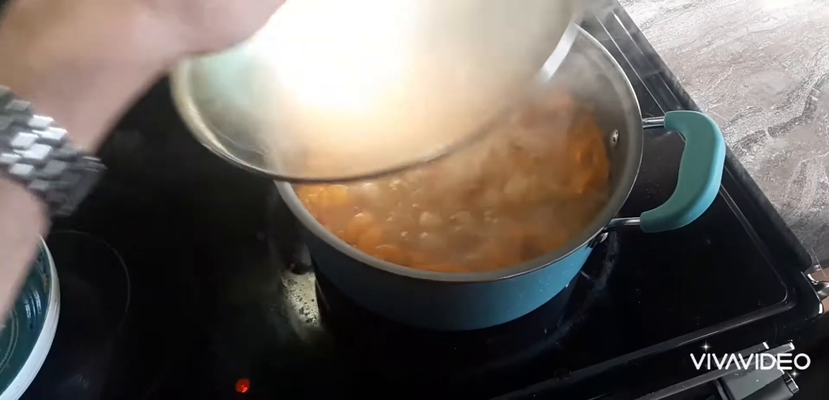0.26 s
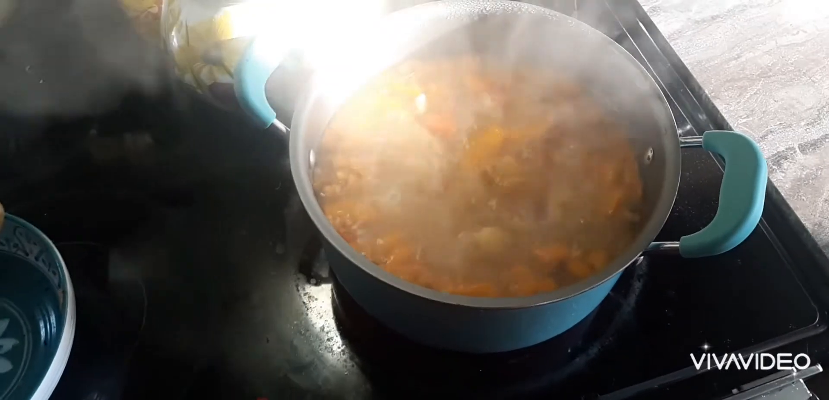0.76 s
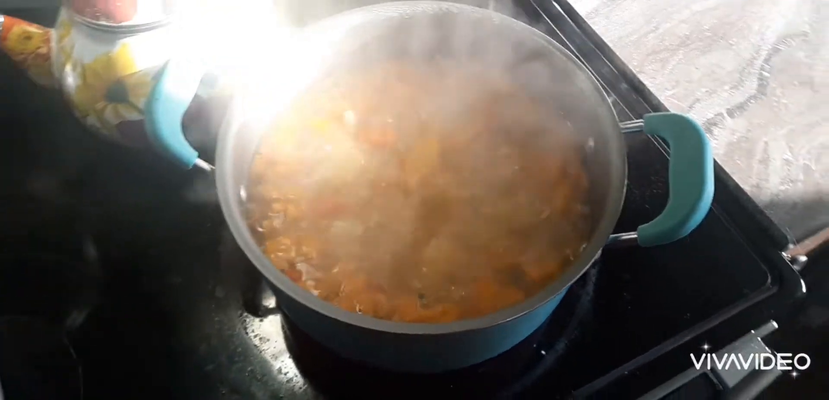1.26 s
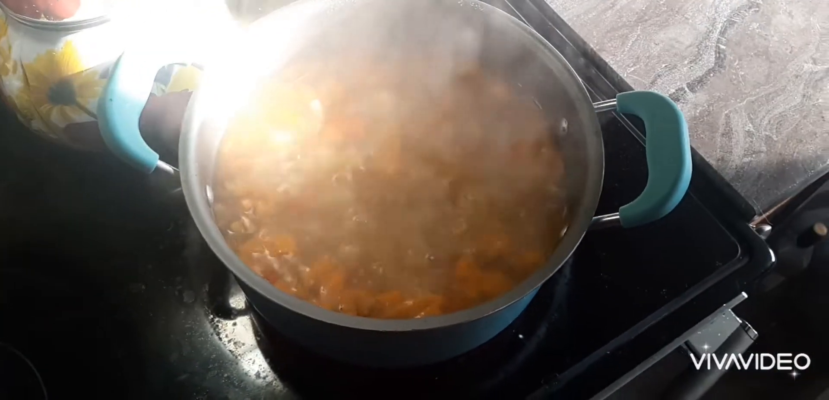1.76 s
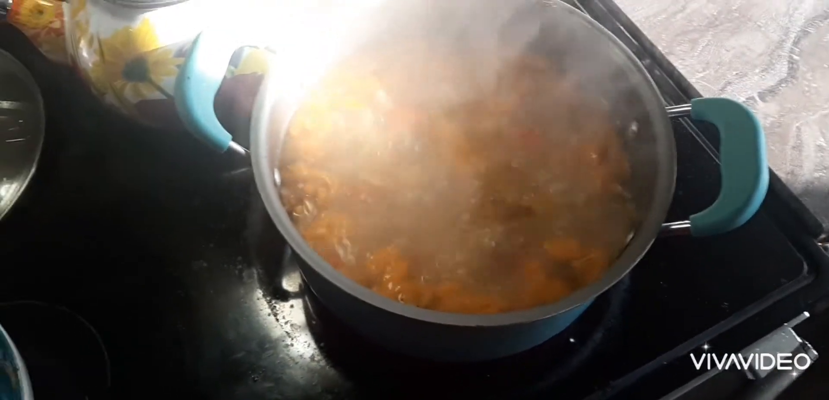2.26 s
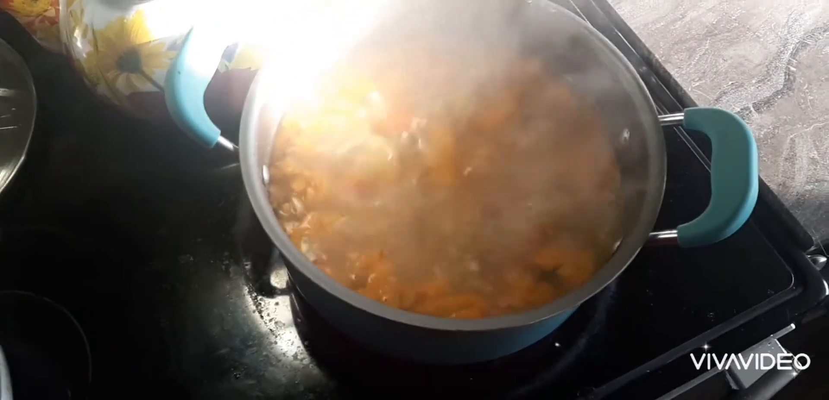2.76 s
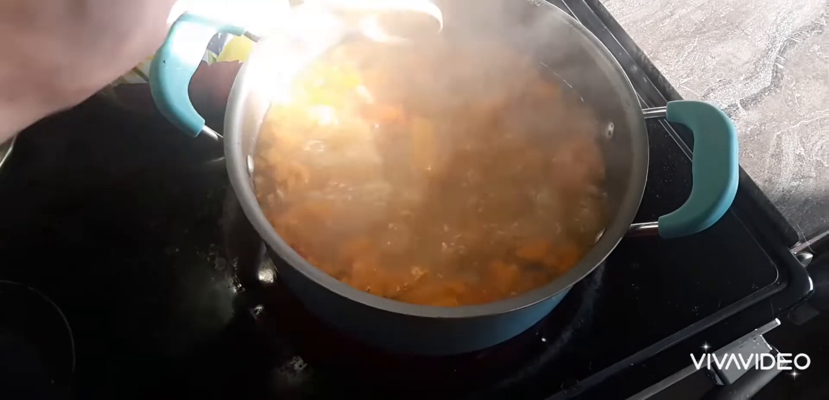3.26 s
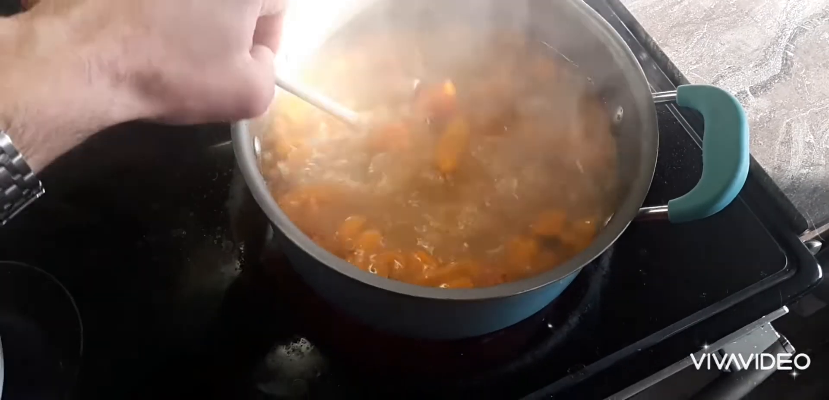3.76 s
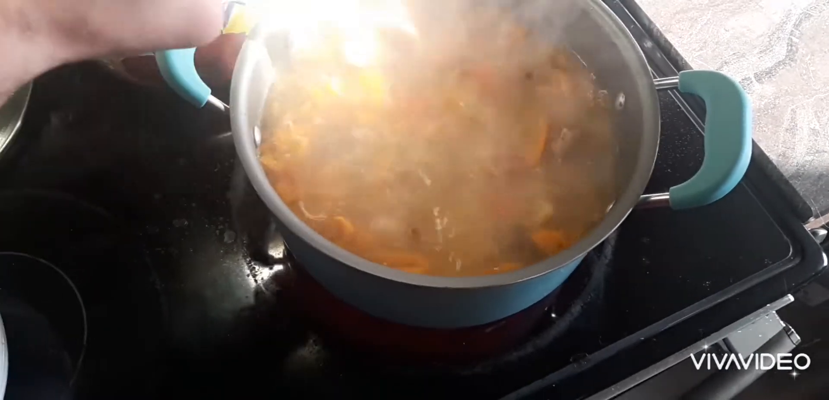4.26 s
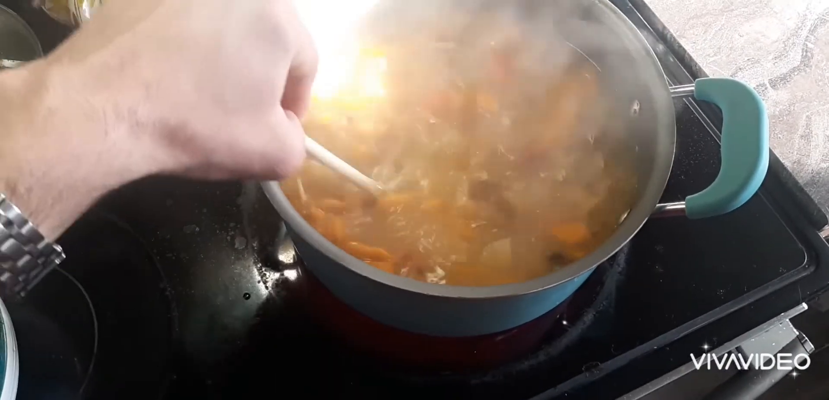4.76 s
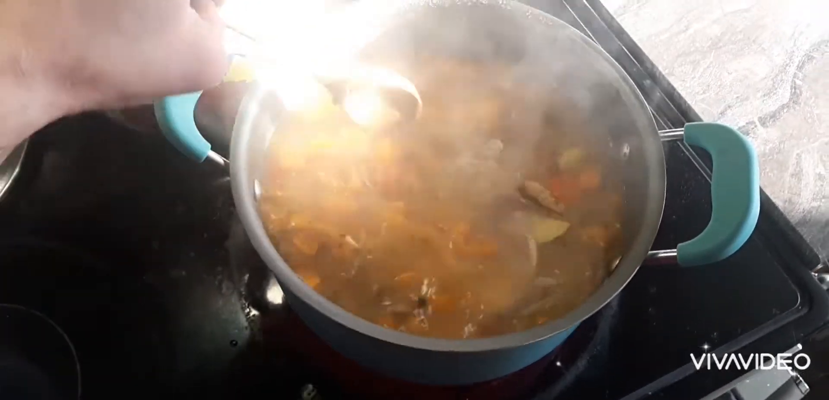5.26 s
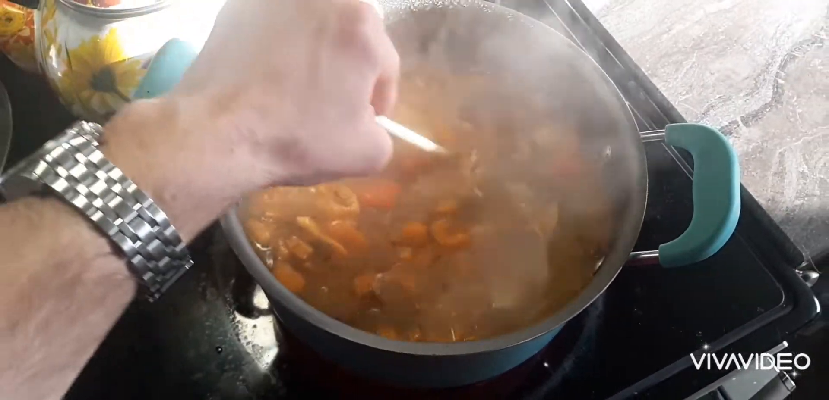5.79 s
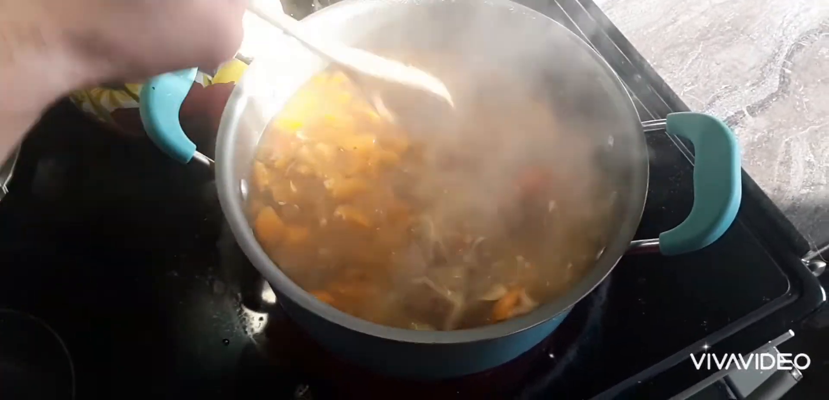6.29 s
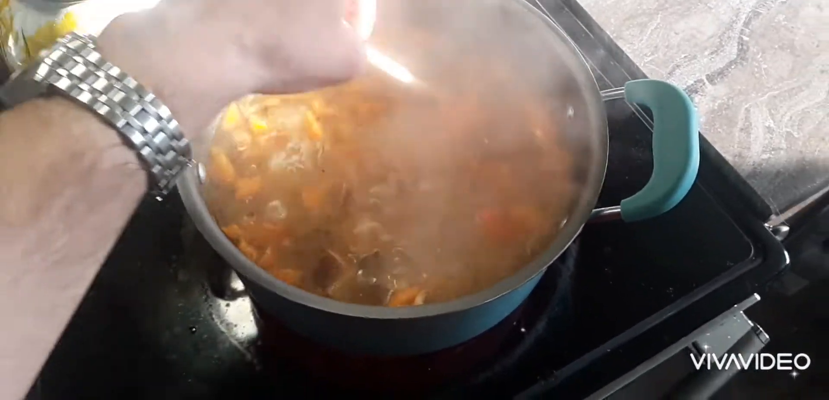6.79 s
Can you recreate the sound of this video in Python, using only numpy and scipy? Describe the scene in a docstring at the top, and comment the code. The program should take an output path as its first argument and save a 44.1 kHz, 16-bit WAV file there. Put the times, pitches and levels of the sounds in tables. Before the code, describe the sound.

Hollow rumble as a lid lifts off boiling soup, a loud glassy clatter at two seconds, then soft wooden knocks, plops and calming bubbles.

```python
"""A pot of soup simmers on a humming hob in a small kitchen, heard from a phone held above it.
Pitched pulses make the bubbles and plops, resonant pips the fine sizzle; the boil calms with the stirring.
The glass lid is lifted and put down with a clatter: worktop thuds, glass modes, a noise shimmer.
A wooden spoon knocks (noise ticks, pot and worktop modes) and stirs: each stroke swells froth and plops.
An appliance motor drones as sines over coloured room noise."""
import sys
import numpy as np
from scipy import signal
from scipy.fft import rfft, irfft, next_fast_len
from scipy.io import wavfile

SR = 44100
rng = np.random.default_rng(int(sys.argv[2]) if len(sys.argv) > 2 else 0)


def materialize(psi):
    """Save the field psi as 16-bit PCM at rate SR to the path in sys.argv[1].

    A 1-D psi becomes a single channel; in a 2-D psi each row is a channel.
    """
    bounded = np.clip(np.atleast_2d(psi).T, -1, 1)
    quanta = np.round(bounded * 32767).astype(np.int16)
    wavfile.write(sys.argv[1], SR, quanta)


N = 310023
TIME = np.arange(N) / SR  # s
RING_TIME = TIME[:SR * 3 // 4]  # s, longest decay rendered
PORT_GAP_M, SOUND_M_PER_S = 0.19, 343


def undb(db):
    """Decibels to gain."""
    return 10 ** (np.asarray(db) / 20)


def unit(x):
    """Scale to rms 1."""
    return x / np.sqrt(np.mean(x ** 2))


def fade(t60_s):
    """Exponential decay, 60 dB down after t60_s."""
    return np.exp(-np.log(1000) * RING_TIME / t60_s)


def swell(middle_s, length_s):
    """Smooth rise and fall, about 9 dB down at either end of its length."""
    return np.exp(-(2 * (TIME - middle_s) / length_s) ** 2)


def pan(db):
    """Left and right gains for a left-minus-right level."""
    return undb(db * np.array([[.5], [-.5]]))


def add(track, start_s, sound):
    """Mix a sound into a track."""
    i = int(np.clip(start_s * SR, 0, N - 1))
    track[..., i:i + sound.shape[-1]] += sound[..., :N - i]


def colour(x, points):
    """Filter by a spectrum of (frequency [Hz], level [dB]) points."""
    length = x.shape[-1]
    size = next_fast_len(length)
    hz, db = np.transpose(points)
    log_bins = np.log(np.fft.rfftfreq(size, 1 / SR) + 1)
    gain = undb(np.interp(log_bins, np.log(hz), db))
    return irfft(rfft(x, size) * gain, size)[..., :length]


def no_bass(x, hz):
    """High-pass: a small source pushes little air at long wavelengths."""
    return signal.sosfilt(signal.butter(4, hz, "high", fs=SR, output="sos"), x)


def walk(rate_hz):
    """Random wander between knots at the given rate, rms 1."""
    knots = rng.standard_normal(4096)
    return unit(np.interp(TIME * rate_hz, np.arange(len(knots)), knots))


def diffuse(length):
    """Noise from all sides at two spaced ports: alike in the bass, unrelated in the treble."""
    size = next_fast_len(length)
    likeness = np.sinc(2 * np.fft.rfftfreq(size, 1 / SR) * PORT_GAP_M / SOUND_M_PER_S)
    noise = rfft(rng.standard_normal((2, size)))
    mid, side = noise * np.sqrt([1 + likeness, 1 - likeness])
    return unit(irfft([mid + side, mid - side], size)[:, :length])


def tones(modes):
    """One decaying sine per mode."""
    return np.array([undb(db) * np.sin(2 * np.pi * hz * RING_TIME) * fade(t60_s)
                     for hz, db, t60_s in modes])


def ring(partials, scatter_db):
    """Each point of contact weights the modes differently."""
    gains = undb(scatter_db * rng.standard_normal(len(partials)))
    return gains @ partials / np.linalg.norm(gains * partials.max(axis=1))


def pulse(hz, t60_s, glide):
    """A few cycles swell within half a period and die away while the pitch slides."""
    t = TIME[:int(1.5 * t60_s * SR) + 2]
    rise = 1 - np.exp(-(2 * hz * t) ** 2)
    decay = np.exp(-np.log(1000) * t / t60_s)
    cycles = hz * t * (1 + glide * t / t60_s / 2)
    return rise * decay * np.sin(2 * np.pi * cycles)


def kitchen(x, wet_db, lead_ms, t60_s=0.14, treble_t60_s=0.46):
    """Direct sound reaches the left port first; the hard walls answer a few milliseconds later."""
    noise = diffuse(len(RING_TIME))
    low = colour(noise, [(2500, 4.5), (4200, -5.5), (8000, -17)])
    walls = low * fade(t60_s) + .75 * (noise - low) * fade(treble_t60_s)
    walls *= np.clip(RING_TIME / 0.0061 - .5, 0, 1)  # late onset
    walls *= undb(wet_db) / np.linalg.norm(fade(t60_s))
    left, right = np.broadcast_to(x, (2, N))
    direct = np.array([left, np.roll(right, int(lead_ms * SR / 1000))])
    return direct + signal.oaconvolve(left[None], walls, axes=1)[:, :N]


# fainter steady motor tones: (mean frequency [Hz], rms level [dB])
FAINT_TONES = [(57, -81.5), (269.2, -77.5), (522.2, -83), (1007, -91.5)]
# room air spectrum: (frequency [Hz], spectral level [dB per Hz])
ROOM_AIR_COLOUR = [(25, -14.5), (40, -9.5), (56, -7.5), (90, -5), (130, 1), (200, -11.5), (400, -16.5),
                   (700, -16.5), (1500, -24), (4000, -20), (11000, -28.5)]
DRONE_DB, ROOM_AIR_DB = -65.5, -68  # rms
DRONE_HZ, DRONE_RISE_HZ, DRONE_RISE_START_S, DRONE_RISE_LENGTH_S = 119.8, 1.42, 3.53, 1.97


def hum(waver_db=0.8):
    """An appliance motor drones unsteadily over the room air and speeds up a little, once."""
    rise = np.clip((TIME - DRONE_RISE_START_S) / DRONE_RISE_LENGTH_S, 0, 1)
    drone_turns = np.cumsum(DRONE_HZ + DRONE_RISE_HZ * rise) / SR
    drone = undb(DRONE_DB + waver_db * walk(4)) * np.sin(2 * np.pi * drone_turns)
    wavering_time = np.cumsum(1 + .005 * walk(2)) / SR
    faint = sum(undb(db) * np.sin(2 * np.pi * hz * wavering_time) for hz, db in FAINT_TONES)
    room_air = undb(ROOM_AIR_DB) * unit(colour(diffuse(N), ROOM_AIR_COLOUR))
    return np.sqrt(2) * (drone + faint) + room_air


GAP_HZ, GAP_RISE_HZ_PER_S = 301, 1200
GAP_DB, GAP_ATTACK_S, GAP_T60_S = -49.5, 0.041, 0.61


def opening():
    """The boil rumbles hollow in the gap under the rising lid, ever higher and, after its attack, weaker."""
    turns = np.cumsum(GAP_HZ + GAP_RISE_HZ_PER_S * RING_TIME) / SR
    flutter = (walk(170.6) + 1j * walk(169))[:len(turns)]
    rumble = (flutter * np.exp(2j * np.pi * turns)).real
    attack = np.minimum(RING_TIME / GAP_ATTACK_S, 1) ** 2
    out = np.zeros(N)
    add(out, 0, undb(GAP_DB) * rumble * attack * fade(GAP_T60_S))
    return kitchen(out, wet_db=-6, lead_ms=.1)


# lid rim landing: (time [s], thud level before doubling [dB], thud pitch [Hz], thud T60 [s],
# clank level [dB])
LID_BLOWS = [(2.0431, -11, 475.6, 0.0048, -32.5), (2.0875, -14.5, 477.2, 0.029, -26.5),
             (2.109, -22, 420, 0.015, -22), (2.112, -10.5, 330, 0.0057, -16.5),
             (2.1185, -6.5, 399.6, 0.01, -12), (2.126, -22, 455, .014, -17.5),
             (2.1298, -10.5, 352, .016, -21.5), (2.1378, -10.5, 420, .014, -24.5),
             (2.1451, -15, 480.7, 0.013, -21), (2.1536, -7.5, 411.5, 0.024, -18.5),
             (2.1827, -20, 397.4, 0.011, -35)]
# worktop, also struck through the pot: (frequency [Hz], relative level [dB], T60 [s])
WORKTOP_MODES = [(130, -14.5, 0.28), (159, -8.5, 0.27), (197.3, -2, 0.22), (243, -9.5, 0.28),
                 (298, -10, 0.34), (325, -8, 0.83), (349.3, -3, 0.099), (369, -1, 0.22), (406, -6.5, 0.071),
                 (464, -3.5, 0.065), (499, 3, .2), (513, 2, 0.097), (802.3, -16.5, .25), (850, -6, 0.21),
                 (939, -8, 0.25)]
# glass and steel rim: (frequency [Hz], relative level [dB], T60 [s])
LID_MODES = [(1175, -5, .22), (1265, -6, .28), (1421, -11, .4), (1502, -6, .26), (1575, -10, .8),
             (1662, -3, .28), (1880, -2, .18), (2175, -6, .25), (2382, -1, .25), (2449, -6, .27),
             (2578, 2, .24), (2632, -3, .24), (2713, -2, .25), (2800, 3, .24), (2947, 2, .18),
             (3057, 1, .2), (3176, -2, .22), (3327, -4, .24), (3451, -1, .2), (3542, -3, .2),
             (3951, -7, .2), (5021, -6, .18)]
# dense upper glass modes: (frequency [Hz], spectral level [dB per Hz])
SHIMMER_COLOUR = [(300, -18), (600, -2.5), (850, -2.5), (1300, -4.5), (2100, -4.5), (2500, -1), (2850, 1.5),
                  (3500, -5.5), (4100, -8), (6000, -11.5), (8500, -17.5), (11000, -20)]
GLASS_DB = -13  # modes relative to clank level


def lid(worktop_db=-9.5, dense_db=-6, dense_t60_s=0.2, crack_db=1, crack_t60_s=0.013):
    """The rim touches twice, then rattles flat: each blow thumps the worktop and rings the glass."""
    thuds, clanks = np.zeros(N), np.zeros((2, N))
    worktop, glass = tones(WORKTOP_MODES), tones(LID_MODES)
    for start_s, thud_db, hz, thud_t60_s, clank_db in LID_BLOWS:
        add(thuds, start_s, 2 * undb(thud_db) * pulse(hz, thud_t60_s, 0))
        add(thuds, start_s, undb(thud_db + worktop_db) * ring(worktop, 1))
        # countless upper modes: crack at contact, then a short shimmer
        shimmer = unit(colour(diffuse(len(RING_TIME)), SHIMMER_COLOUR))
        shimmer *= undb(dense_db) * fade(dense_t60_s) + undb(crack_db) * fade(crack_t60_s)
        clank = shimmer + undb(GLASS_DB) * ring(glass, 2.7)
        add(clanks, start_s, undb(clank_db) * clank)
    thuds = kitchen(no_bass(thuds, hz=118), wet_db=-6.0, lead_ms=.26, t60_s=0.3)
    clanks = kitchen(no_bass(clanks, hz=249.9), wet_db=-9.0, lead_ms=0.2, t60_s=0.37, treble_t60_s=.25)
    return thuds + clanks


# rim scrape: (frequency [Hz], spectral level [dB per Hz])
SLIDE_COLOUR = [(300, 6.5), (700, -0.5), (1800, -15), (2400, -1), (2800, -12), (3200, 0.5), (4500, -10),
                (6000, -1), (7000, -7), (11000, -11.5)]
SLIDE_MIDDLE_S, SLIDE_LENGTH_S, SLIDE_DB = 2.472, 0.081, -52


def slide():
    """The steel rim catches and slips as the lid slides to rest: sparse random clicks, coloured."""
    slips = rng.standard_normal((2, N)) * (rng.random(N) < 2500 / SR)
    scrape = unit(no_bass(colour(slips, SLIDE_COLOUR), hz=250))
    return scrape * undb(SLIDE_DB) * swell(SLIDE_MIDDLE_S, SLIDE_LENGTH_S)


# spoon on pot: (time [s], knock level [dB], dull body level [dB], left minus right [dB])
KNOCKS = [(3.4515, -31, -54.5, -3), (3.4570, -40, -57, -13), (3.5090, -47, -56.5, 0),
          (3.5390, -42.5, -49.5, -5), (3.6870, -43.5, -60, -10), (4.239, -47, -70, -7),
          (4.4662, -44, -51, 0), (4.4783, -34.5, -51, -7.5), (4.5060, -60, -51, -2),
          (6.6024, -50.5, -85, -10), (6.752, -30.5, -68, -11), (6.769, -46, -78, -13),
          (6.8118, -43.5, -84, -12), (6.8564, -47, -67, -9)]
# pot wall, damped by the soup: (frequency [Hz], relative level [dB], T60 [s])
POT_MODES = [(720, -10, 0.029), (1430, -21, 0.021), (1690, -17, 0.052), (2510, -20, 0.012),
             (3300, 15, 0.026), (3720, 12, 0.0087), (3840, 15, 0.018), (4810, 5, 0.0041)]
# wooden tick: (frequency [Hz], spectral level [dB per Hz])
KNOCK_COLOUR = [(300, -15), (900, -2.5), (1600, 2.5), (2500, 4.5), (3700, 1), (4600, 1), (6500, 2),
                (8000, 0), (11000, -11)]
TICK_T60_S = .012


def spoon(ring_db=-4, bump_db=1, choke_t60_s=0.12, hob_db=3):
    """Wood on the filled pot: a dry tick, a choked ring, and a dull bump through the hob."""
    ticks, bumps = np.zeros((2, N)), np.zeros(N)
    pot, worktop = tones(POT_MODES), tones(WORKTOP_MODES)
    for start_s, knock_db, body_db, pan_db in KNOCKS:
        tick = unit(colour(rng.standard_normal(len(RING_TIME)), KNOCK_COLOUR))
        # soft wet wood takes about a millisecond to bite
        tick *= fade(TICK_T60_S) * (1 - fade(0.0015))
        add(ticks, start_s, undb(knock_db) * pan(pan_db) * (tick + undb(ring_db) * ring(pot, 1.5)))
        # the heavy pot damps the worktop under it
        add(bumps, start_s, undb(body_db + hob_db) * ring(worktop, 2) * fade(choke_t60_s))
        add(bumps, start_s, undb(body_db + bump_db) * pulse(152, 0.1, 0))
    ticks = kitchen(ticks, wet_db=4, lead_ms=0.2, t60_s=0.36, treble_t60_s=.24)
    bumps = kitchen(no_bass(bumps, hz=85), wet_db=2, lead_ms=0.14, t60_s=0.34)
    return ticks + bumps


BUBBLE_SIZES_HZ = np.geomspace(800, 10500, 18)
BURSTS_PER_S_PER_SIZE = 65
FLURRY_KNOTS = 240  # over the whole scene


def fizz(spectrum, spread_db, flurry_db, wet_db, sharpness):
    """Tiny bubbles of each size burst in their own flurries as rounded pips, most faint, few loud; rms 1."""
    out, count = np.zeros(N), int(BURSTS_PER_S_PER_SIZE * N / SR)
    for hz in BUBBLE_SIZES_HZ:
        at = rng.integers(0, N, count)
        knots = rng.standard_normal(FLURRY_KNOTS)
        flurry = np.interp(at / N, np.linspace(0, 1, FLURRY_KNOTS), knots)
        loudness_db = spread_db * np.minimum(rng.exponential(size=count), 4)
        sizes = undb(loudness_db + flurry_db * np.minimum(flurry, 2))
        # tiny offset keeps the filters numerically awake
        bursts = np.bincount(at, sizes * rng.choice([-1, 1], count), N) + 1e-18
        resonance = signal.iirpeak(hz, sharpness, fs=SR)
        # two passes round the onset
        out += signal.lfilter(*resonance, signal.lfilter(*resonance, bursts))
    return unit(kitchen(no_bass(colour(out, spectrum), hz=300.2), wet_db, lead_ms=.1))


# boil crackle: (frequency [Hz], spectral level [dB per Hz])
SIZZLE_COLOUR = [(700, -8.5), (1500, -13), (2400, -12), (3300, -3.5), (4000, 1), (4600, -3.5), (5600, 4),
                 (6500, 3.5), (7500, -4), (10000, -5), (11500, -23.5)]


def sizzle(strength, surge_db=1.73):
    """The boil crackles at the surface and along the hot wall."""
    crackle = fizz(SIZZLE_COLOUR, spread_db=4.0, flurry_db=4.0, wet_db=-2.0, sharpness=3.5)
    return crackle * strength * undb(surge_db * walk(18))


# breaking froth: (frequency [Hz], spectral level [dB per Hz])
WASH_COLOUR = [(300, -15), (900, -7.5), (1600, -20.5), (2500, -10.5), (3200, -0.5), (3900, 2), (4600, -7.5),
               (7000, -5.5), (11000, -14)]


def wash(strength):
    """The spoon folds the soup over and breaks its froth."""
    return strength * fizz(WASH_COLOUR, spread_db=3.5, flurry_db=3.2, wet_db=-1.5, sharpness=3.5)


# single bubbles snapping at the surface: (time [s], level before attack shaping [dB])
SNAPS = [(2.807, -33.5), (4.348, -42), (5.162, -36.5), (5.185, -39.5), (5.299, -42), (5.437, -39),
         (5.602, -39), (6.576, -36), (6.6, -37)]
SNAP_MEAN_HZ = 6360


def snaps(wet_db=-8, scatter=0.055, t60_s=0.0062, attack_t60_s=0.0011):
    """A small bubble's film breaks with a bright tick."""
    out = np.zeros(N)
    for (start_s, db), chance in zip(SNAPS, rng.standard_normal(len(SNAPS))):
        note = pulse(SNAP_MEAN_HZ * (1 + scatter * chance), t60_s, .05)
        add(out, start_s, undb(db) * note * (1 - fade(attack_t60_s))[:len(note)])
    return kitchen(out, wet_db, lead_ms=.1)


def bubbling(strength, centre_hz=370, octaves=.33, cycles=8, spread_db=4.0, surge_db=1.56,
             surges_per_s=16, count=1800):
    """Steam bubbles swell and collapse on the bottom of the pot, in short surges."""
    out = np.zeros(N)
    starts_s = rng.random(count) * N / SR
    chances = np.clip(rng.standard_normal((count, 2)), -3, 2.4)
    for start_s, (pitch, size) in zip(starts_s, chances):
        hz = centre_hz * 2 ** (octaves * pitch)
        add(out, start_s, undb(spread_db * size) * pulse(hz, cycles / hz, 0.096))
    out *= undb(surge_db * walk(surges_per_s))
    return no_bass(unit(kitchen(out, wet_db=-2.5, lead_ms=.1, t60_s=0.41)), hz=132) * strength


PLOP_CYCLES = 11  # T60 in periods of the starting pitch


def small_plops(strength, centre_hz=1020, octaves=.38, spread_db=5, count=700):
    """Many faint air pockets open wherever the soup moves."""
    out = np.zeros(N)
    starts_s = rng.random(count) * N / SR
    chances = np.clip(rng.standard_normal((count, 2)), -2, 2)
    for start_s, (pitch, size) in zip(starts_s, chances):
        hz = centre_hz * 2 ** (octaves * pitch)
        add(out, start_s, undb(spread_db * size) * pulse(hz, PLOP_CYCLES / hz, .1))
    return unit(kitchen(out, wet_db=-1, lead_ms=.14, t60_s=.3)) * strength


# air pockets bursting: (time [s], level before attack shaping [dB], starting pitch [Hz])
PLOPS = [(0.71, -37, 980), (.820, -45.5, 366), (1.114, -44, 384), (2.5067, -45.5, 1000),
         (3.5389, -34, 1040), (3.628, -44, 1120), (4.479, -38, 965), (4.6419, -31.5, 1320),
         (4.6500, -26.5, 820), (4.6615, -35, 680), (4.683, -34, 1010), (4.91, -40.5, 1355),
         (5.1472, -34, 1430), (5.5479, -39, 1194), (5.702, -42.5, 1443), (5.774, -50.5, 1200),
         (6.640, -51, 1096), (6.738, -40.5, 1546), (6.752, -30.5, 1810), (6.8112, -37, 1025),
         (6.8404, -37, 1550), (6.854, -34.5, 900)]


def plops(glide=.033, splash_db=-6, opening_cycles=1.4, splash_rise_cycles=12):
    """Air pockets open in the thick soup, which chokes their rising note after a few cycles."""
    out = np.zeros(N)
    for start_s, db, hz in PLOPS:
        t60_s = PLOP_CYCLES / hz
        note = pulse(hz, t60_s, glide)
        add(out, start_s, undb(db) * note * (1 - fade(opening_cycles / hz))[:len(note)])
        # the tearing film spatters just after the note
        splash_colour = [(hz / 3, -14), (hz, 0), (1.3 * hz, -3), (3 * hz, -45)]
        splash = unit(colour(rng.standard_normal(len(RING_TIME)), splash_colour))
        splash *= fade(2 * t60_s) * (1 - fade(splash_rise_cycles / hz)) ** 2
        add(out, start_s, undb(db + splash_db) * splash)
    return kitchen(no_bass(out, hz=220), wet_db=-2.5, lead_ms=.14, t60_s=.36)


# spoon strokes: (middle [s], length [s], froth level [dB], hot-wall sizzle level [dB],
# small plops level [dB])
STROKES = [(3.879, 0.65, -59.5, -58.5, -72), (4.717, 0.38, -65.5, -62, -64.5),
           (5.238, 0.065, -66, -79, -78), (5.73, 0.21, -71.5, -76, -71), (6.394, 0.37, -67.5, -66.5, -95),
           (6.898, 0.29, -70, -65, -82)]


def stirring():
    """Strength of froth, wall sizzle and small plops, summed over the strokes."""
    return sum(undb(levels_db)[:, None] * swell(middle_s, length_s)
               for middle_s, length_s, *levels_db in STROKES)


BUBBLING_DB, SIZZLE_DB = -62.5, -66  # before stirring
UNCOVER_S = .14  # the lifted lid lets the sizzle out
FLARE_MIDDLE_S, FLARE_LENGTH_S, FLARE_DB = 1.513, 1.8, -62
# stirring cools the bottom of the pot
CALM_FROM_S, BUBBLING_FALL_DB_PER_S, SIZZLE_FALL_DB_PER_S = 3.33, 6, 2.5
SLOSH_DB = -9.5  # low gurgle of a stroke, relative to its froth


def soup(froth_pan_db=-4.0, flare_froth_db=-6, boil_plops_db=-15, flare_plops_db=-10):
    """The boil flares once in open air and calms when stirred; strokes add froth, sizzle, plops, gurgle."""
    stirred_s = np.maximum(TIME - CALM_FROM_S, 0)
    froth, wall, churn = stirring()
    flare = undb(FLARE_DB) * swell(FLARE_MIDDLE_S, FLARE_LENGTH_S)
    boil = undb(BUBBLING_DB - BUBBLING_FALL_DB_PER_S * stirred_s)
    uncovered = np.minimum(TIME / UNCOVER_S, 1) ** 2
    simmer = undb(SIZZLE_DB - SIZZLE_FALL_DB_PER_S * stirred_s) * uncovered
    low = bubbling(np.hypot(boil, undb(SLOSH_DB) * froth))
    plop_strength = np.hypot(undb(boil_plops_db) * boil, churn + undb(flare_plops_db) * flare)
    popping = plops() + small_plops(plop_strength)
    high = sizzle(np.hypot(simmer, flare + wall))
    high = high + wash(froth + undb(flare_froth_db) * flare) + snaps()
    return low + popping + high * pan(froth_pan_db)


def scene():
    """Room, lid, spoon and soup, left and right."""
    return hum() + opening() + lid() + slide() + spoon() + soup()


TOP_HZ = 11300


def record(dry):
    """The phone rounds the highest peaks and cuts the top."""
    rounded = 1.5 * np.tanh(dry / 1.5)
    return signal.sosfilt(signal.ellip(8, .2, 70, TOP_HZ, fs=SR, output="sos"), rounded)


dry = scene()
out = record(dry)
materialize(out)
```